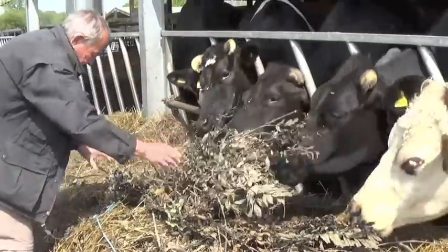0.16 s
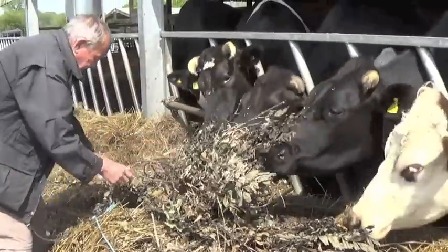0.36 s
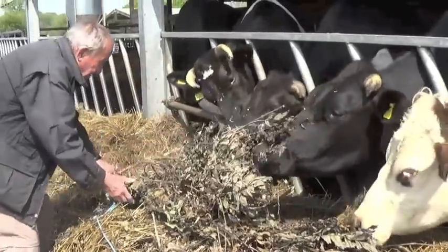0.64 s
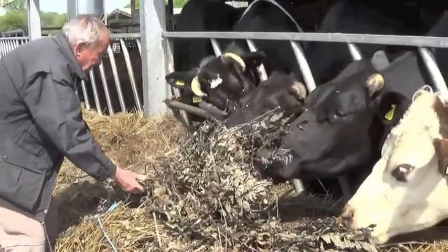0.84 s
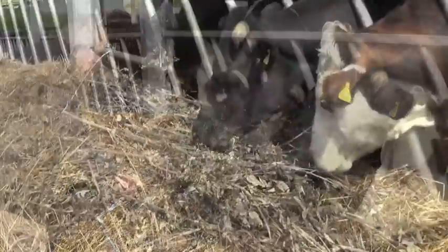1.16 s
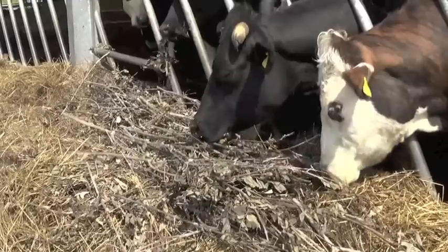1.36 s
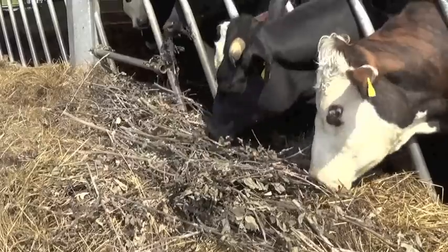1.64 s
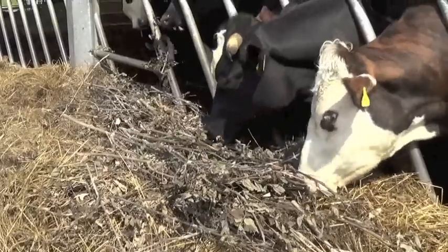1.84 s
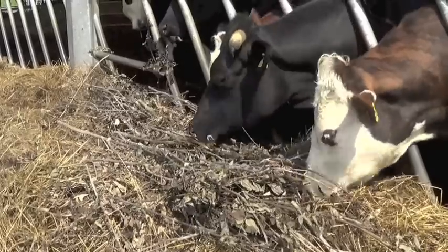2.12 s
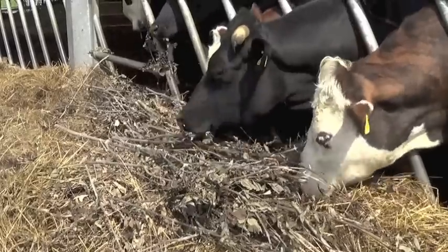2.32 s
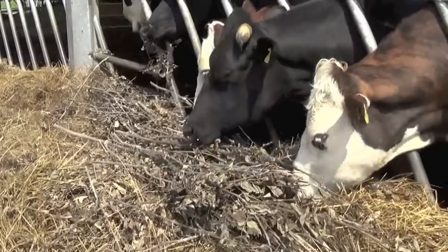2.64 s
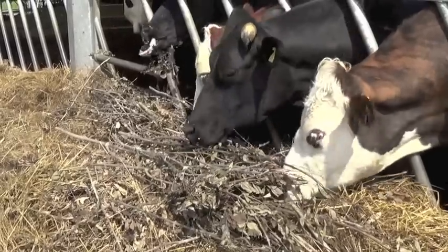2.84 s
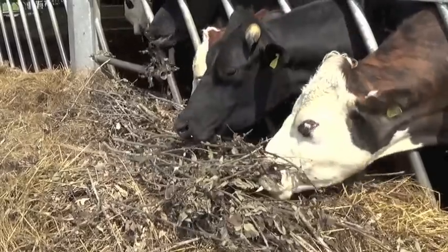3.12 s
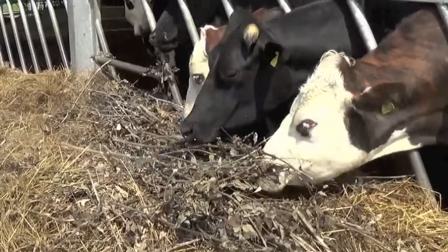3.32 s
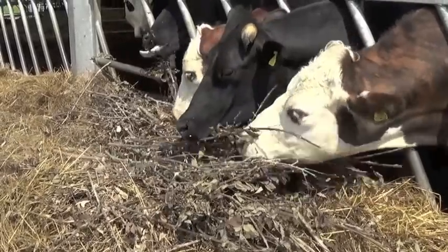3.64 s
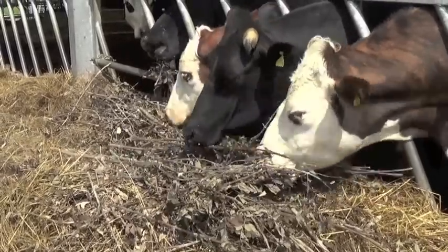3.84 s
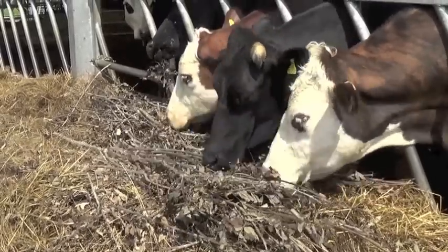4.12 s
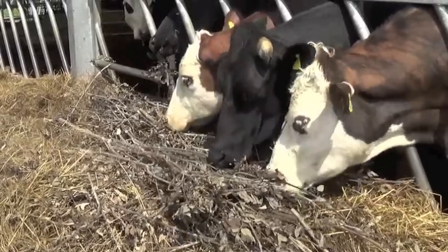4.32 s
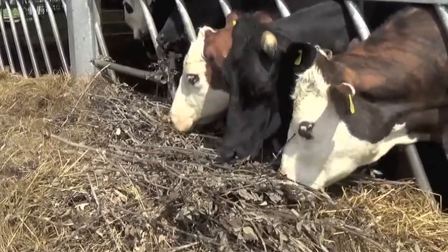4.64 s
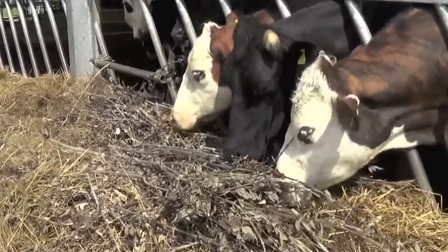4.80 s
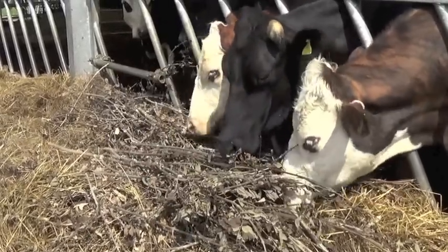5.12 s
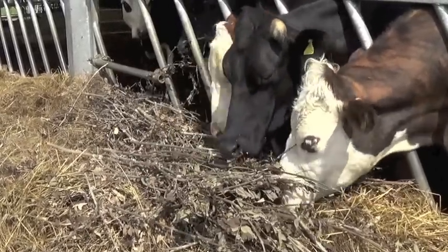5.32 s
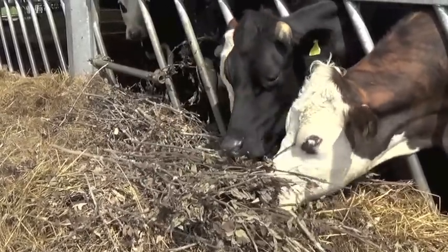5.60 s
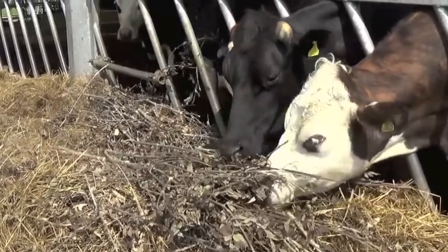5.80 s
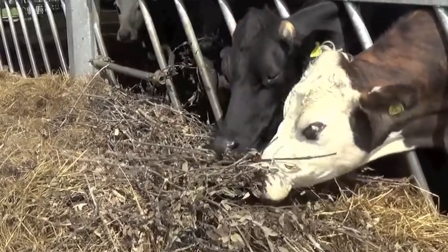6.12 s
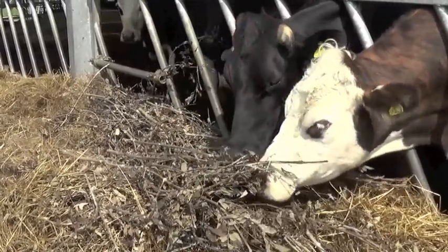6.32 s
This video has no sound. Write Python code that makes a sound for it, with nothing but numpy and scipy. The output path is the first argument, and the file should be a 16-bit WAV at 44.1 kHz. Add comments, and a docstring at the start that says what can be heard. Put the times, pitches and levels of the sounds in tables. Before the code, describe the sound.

Dry leaves crackle and rustle densely from start to finish, about six and a half seconds, as cattle tug at a heap of branches close to a stereo microphone in a barn. The bright, brittle sound swells with each pull, notably at the start and around 1.8, 2.1, 3, 4.1 and 6.2 seconds. Twigs tick and snap sharply throughout, clustering near 1.7, 2.4 to 2.9, 4.5 and 5.3 seconds. A distant cow hums faintly during the first second. Heads and hooves bump dully at 0.3, around 2.3, 3.3 and 5.5 seconds. A near cow gives one short, fluttering snort at 2.6 seconds. Necks rubbing the steel rail make faint squeaks and scrapes, mostly between 4 and 4.8 seconds, and a neck chain clinks once against it at 4.9. Soft puffs of air rumble on the microphone, mainly near 2.4 and 3.3 seconds, over a low, steady barn murmur.

```python
"""Dry leafy branches crackle and snap as cattle tug at them along a feed rail, close to the microphone.
Countless brittle leaves crack in swells, twigs break, heads and hooves bump. A neck chain chimes once
on the steel rail, and rubbing necks make it squeak. A near cow snorts through flapping nostrils and
a far one hums. Puffs of air buffet the camera's stereo microphone over the murmur of the barn."""
import sys
import numpy as np
from scipy import signal
from scipy.fft import rfft, irfft
from scipy.io import wavfile
from scipy.ndimage import uniform_filter1d

SR = 44100
rng = np.random.default_rng(int(sys.argv[2]) if len(sys.argv) > 2 else 0)


def generate_wav(sig):
    """Save sig (samples, or channels by samples) to the path in sys.argv[1] as 16-bit PCM at SR."""
    pcm = np.round(np.clip(np.atleast_2d(sig).T, -1, 1) * 32767).astype(np.int16)
    wavfile.write(sys.argv[1], SR, pcm)


N = 284841

# Dry leaves at close range: freq_hz, gain_db
LEAF_SPECTRUM = [(240, -41), (400, -15), (585, -26), (727, -13.5), (1250, -18.5), (1440, -16), (1780, -11),
                 (3240, -7), (4810, -3.5), (6670, -1.5), (8630, 5), (10300, 4.5), (13400, -80),
                 (22000, -120)]
# Spread of the heap across the stereo microphone: freq_hz, side_minus_mid_db
HEAP_WIDTH = [(60, -11), (110, 2), (190, 9), (340, -55), (610, -31.5), (1090, -27), (1950, -14),
              (3470, -16.5), (6200, -17.5), (11100, -17)]
# How hard the herd works at the heap: time_s, level_db
BROWSING = [(0.0, -23.5), (.13, -24), (.32, -32.5), (.66, -26.5), (1.06, -29), (1.5, -27.5), (1.9, -31.5),
            (2.12, -22.5), (2.3, -25.5), (2.6, -33.5), (2.96, -21.5), (3.26, -31.5), (3.46, -23.5),
            (3.8, -26), (4.08, -22.5), (4.2, -29), (4.6, -30), (5.07, -37.5), (5.35, -34.5), (5.55, -26),
            (5.74, -33.5), (6.05, -26.5), (6.46, -43)]
# Single tugs that swish a branch out: peak_s, level_db, fall_s
BRANCH_TUGS = [(.1, -24, .05), (0.595, -25.5, 0.048), (0.853, -27.5, 0.048), (1.175, -32, 0.16),
               (1.384, -32.5, 0.052), (1.64, -24, 0.042), (1.777, -22, 0.055), (2.066, -28, 0.033),
               (2.397, -31.5, 0.042), (2.586, -29, 0.02), (3.326, -28.5, 0.073), (3.938, -26.5, 0.046),
               (4.396, -36.5, 0.12), (4.54, -43, 0.022), (4.657, -29, 0.017), (4.784, -29, 0.1),
               (4.886, -25.5, 0.019), (4.995, -32, 0.028), (5.13, -32, 0.035), (5.256, -35.5, 0.054),
               (5.446, -30, 0.05), (5.56, -26, .04), (5.79, -25, 0.021), (5.91, -26, 0.088),
               (6.246, -21.5, 0.12)]

def leaves(cracks_per_s=3000, spread_db=4.0, cycles=1.63, stems_follow=0.72):
    """Brittle leaves right at the microphone crack in clumps, each crack dying in a few cycles."""
    t, crackle = np.arange(400) / SR, np.zeros((2, N))
    for hz in np.geomspace(600, 10500, num=16):
        size = gain_of(spread_db * np.minimum(rng.exponential(1, N), 5)) * rng.choice([-1., 1.], N)
        cracks = size * (rng.random(N) < cracks_per_s / SR * hz / 5000)  # denser at higher pitch
        ring = np.sin(2 * np.pi * hz * t) * np.exp(-t * hz / cycles)
        mid_side = signal.oaconvolve([cracks, cracks * rng.standard_normal(N)], ring[None], axes=1)[:, :N]
        patches = gain_of(2.26 * wander(rate_hz=27))
        crackle += np.sqrt(hz) * mid_side / np.std(mid_side[0]) * patches  # equal power per hertz
    hiss = gain_of(-4) * rng.standard_normal((2, N))  # leaves farther off blur together
    clumps = gain_of(1.37 * wander(rate_hz=58))
    mid, side = colour((unit_rms(crackle) + hiss) * clumps, LEAF_SPECTRUM)
    heap = stereo(mid, colour(side, HEAP_WIDTH)) / np.std(band(mid, 6400, 10140))
    stems, fine = split(heap, hz=2700)
    tugs = swells([(s, db, 0.45 * fall, fall) for s, db, fall in BRANCH_TUGS])
    fine_db = 10 * np.log10(gain_of(2 * curve(BROWSING)) + tugs)
    stems_db = fine_db - (1 - stems_follow) * (fine_db - fine_db.mean())  # coarse stems swell less
    return gain_of(fine_db) * fine + gain_of(stems_db) * stems


# Twigs breaking in the heap: start_s, level_db, relative_body_db
TWIG_BREAKS = [(0.5119, -10.5, -4), (0.7218, -12, -9), (1.0345, -10.5, -10), (1.3972, -9, -15),
               (1.6821, -6, -21), (1.722, -5, -14), (1.915, -12, -26), (1.941, -10, -23),
               (2.0043, -11, -19), (2.3883, -5, -25), (2.5708, -6.5, -19), (2.6646, -10.5, -20),
               (2.719, -10, -21), (2.7507, -16, -13), (2.787, -9, -19), (2.847, -7, -12), (3.0445, -7, -16),
               (3.2126, -6.5, -25), (3.271, -12.5, -20), (3.3547, -8, -18), (3.6626, -7, -16),
               (3.9762, -6.5, -25), (4.4043, -7, -20), (4.454, -7, -15), (4.5154, -10, -25),
               (4.562, -8.5, -10), (4.792, -8.5, -20), (4.9751, -13.5, -20), (5.112, -13.5, -19),
               (5.21, -13.5, -18), (5.247, -10.5, -24), (5.257, -13, -25), (5.2752, -8, -17),
               (5.3075, -8, -14), (5.3552, -24, -13), (5.7853, -9, -20), (6.1424, -8, -16),
               (6.2835, -8, -22), (6.354, -7, -18)]

def twig_snaps(t60_s=0.02, tick_db=11.0, tick_s=0.0022):
    """Each close break is a sharp tick and a splintering burst; thick twigs have more woody body."""
    out, t = np.zeros((2, N)), np.arange(3000) / SR
    for s, db, body_db in TWIG_BREAKS:
        noise = rng.standard_normal(len(t))
        pan, shorten = rng.standard_normal(2)
        splinter = gain_of(-60 * t / t60_s / 0.9 ** shorten)
        envelope = splinter + gain_of(tick_db) * np.exp(-(t / tick_s) ** 2)
        edge, body = envelope * band(noise, 7000, 11000), envelope * band(noise, 2100, 6440)
        burst = gain_of(db) * (edge / abs(edge).max() + gain_of(body_db) * body / abs(body).max())
        add(out[0], s, burst * (1 + 0.13 * pan))
        add(out[1], s, burst * (1 - 0.21 * pan))
    return out


def twig_ticks(per_s=70, base_db=-13, spread_db=2.0):
    """Small twigs give very short ticks all through the heap."""
    size = gain_of(base_db + spread_db * np.minimum(rng.exponential(1, N), 3))
    ticks = size * (rng.random(N) < per_s / SR)
    return band(stereo(ticks, .15 * ticks * rng.standard_normal(N)), 3470, 9900)


# Heads and hooves at the rail: peak_s, level_db, pitch_hz
BODY_BUMPS = [(.306, -33, 300), (1.827, -42, 130), (2.178, -34, 200), (2.288, -29, 115), (2.385, -29, 170),
              (2.712, -39, 170), (3.203, -33, 270), (3.266, -36, 298), (3.385, -34, 250), (3.418, -30, 230),
              (3.484, -36, 130), (3.962, -40, 160), (4.691, -36, 560), (5.443, -35, 149), (5.553, -35, 140)]

def bumps(cycles=1.7, grit=0.9):
    """A head or hoof lands as a dull, low push with no ring."""
    out, t = np.zeros(N), np.arange(-1500, 1500) / SR
    for s, db, hz in BODY_BUMPS:
        rough = unit_rms(band(rng.standard_normal(len(t)), 0.4 * hz, 2.4 * hz))
        push = grit * rough - np.cos(2 * np.pi * hz * t)
        add(out, s + t[0], gain_of(db) * push * np.exp(-(t * hz / cycles) ** 2))
    return out


# Modes of the steel feed rail: pitch_hz, level_db, t60_s
RAIL_MODES = [(583, -18, 0.66), (2653, -15, 0.58), (2700, -6, 0.53), (2694, -3, .3), (2930, -9, 0.36),
              (2994, 1.5, 0.13), (4030, -6, 0.11), (7400, -28, 0.34), (7900, -6, .25), (7620, 4, 0.18),
              (7780, 3, 0.2), (8500, -34, 0.36)]

def chain_chime(start_s=4.876, gain_db=-26, rebound_s=.037):
    """A link of a neck chain strikes the rail, rattles and rebounds once."""
    out, t = np.zeros(N), np.arange(SR // 2) / SR
    ring = sum(gain_of(db - 60 * t / t60) * np.sin(2 * np.pi * (hz * t + rng.random()))
               for hz, db, t60 in RAIL_MODES)
    clack = gain_of(3 - 60 * t / 0.075) * band(rng.standard_normal(len(t)), 340, 7800)
    blows = gain_of(-11) * rng.standard_normal(2500) * (rng.random(2500) < .003)  # the rattle
    blows[0], blows[round(rebound_s * SR)] = 1, gain_of(-3)
    add(out, start_s, gain_of(gain_db) * signal.oaconvolve(blows, ring + clack))
    return out


# Faint squeaks and scrapes along the rail: start_s, level_db, pitch_hz, width_hz, length_s
RAIL_RUBS = [(.64, -42, 429, 56, .1), (0.7, -43.5, 910, 380, 0.14), (3.976, -43, 1316, 59, 0.1),
             (4.09, -46, 1200, 70, 0.099), (4.14, -49, 1255, 90, 0.56), (4.707, -38, 1060, 400, 0.06),
             (4.704, -40.5, 1900, 370, 0.064), (4.707, -37, 2850, 600, 0.058),
             (1.565, -34.5, 2950, 500, 0.058), (5.9, -36, 5800, 100, 0.08)]

def rail_squeaks():
    """Necks rub the steel: a narrow resonance squeaks, a wide one scrapes."""
    out = np.zeros(N)
    for s, db, hz, width, length in RAIL_RUBS:
        rub = resonate(rng.standard_normal(int(length * SR)), hz, width)
        add(out, s, gain_of(db) * unit_rms(rub) * np.sqrt(np.hanning(len(rub))))
    return out


# Resonances of the near cow's nose: pitch_hz, width_hz, level_db
NOSE_RESONANCES = [(372, 230, 7), (660, 540, 16), (950, 520, -17), (1250, 350, -14)]
# Blasts of her breath: peak_s, level_db, rise_s
SNORT_BLASTS = [(2.626, -31.5, 0.053), (2.679, -37, .025)]

def near_snort(flap_hz=127, flap_db=-2.5, fall_s=0.0094):
    """A cow near the microphone blasts air through nostrils that flap quickly."""
    turns = np.cumsum(flap_hz * (1 + .015 * wander(rate_hz=48))) / SR
    flaps = np.diff(np.floor(turns), prepend=0)
    breath = rng.standard_normal(N) + gain_of(flap_db) * flaps * np.sqrt(SR / flap_hz)
    nose = sum(gain_of(db) * unit_rms(resonate(breath, hz, width)) for hz, width, db in NOSE_RESONANCES)
    return np.sqrt(swells([(s, db, rise, fall_s) for s, db, rise in SNORT_BLASTS])) * unit_rms(nose)


# Air rumbling on the microphone: freq_hz, gain_db
PUFF_SPECTRUM = [(15, -35), (25, -15), (91, 0), (173, -1.5), (223, -1.5), (647, -15.5), (763, -28),
                 (900, -31), (1170, -36), (1980, -120)]
# Gusts passing over it: peak_s, level_db, rise_and_fall_s
PUFFS = [(.7, -55.5, 0.47), (1.705, -55, 0.18), (2.363, -39.5, 0.22), (2.62, -55, 0.097), (3.34, -42, 0.26),
         (3.74, -47, .14), (4.355, -52, 0.19), (4.808, -54.5, 0.16), (5.165, -49.5, 0.062),
         (5.562, -42.5, 0.087), (5.98, -55.5, 0.17), (6.46, -50.5, .12)]

def air_puffs(calm_db=-65.5, lumps_db=3.0, side_db=-4.0):
    """Lumpy turbulence at the microphone ports; the longest waves reach both alike."""
    mid, side = colour(rng.standard_normal((2, N)), PUFF_SPECTRUM) * gain_of(lumps_db * wander(26))
    power = gain_of(2 * calm_db) + swells([(s, db, length, length) for s, db, length in PUFFS])
    _, short_waves = split(side, hz=90)
    return np.sqrt(power) * stereo(mid, gain_of(side_db) * short_waves) / np.std(mid)


# A cow's call from far across the barn: time_s, pitch_hz, level_db
FAR_CALL = [(.1, 257.7, -61), (.2, 270.6, -51.5), (.35, 281, -50), (.64, 278, -42.5), (.75, 274, -45),
            (.94, 268.4, -40.5), (1.0, 253, -48), (1.07, 258, -60)]

def far_hum(octave_db=-22):
    """A closed-mouth low, nearly a pure tone at this distance."""
    t = np.arange(N) / SR
    phase = 2 * np.pi * np.cumsum(curve(FAR_CALL)) / SR
    tone = np.sin(phase) + gain_of(octave_db) * np.sin(2 * phase)
    calling = (t > FAR_CALL[0][0]) & (t < FAR_CALL[-1][0])
    return np.sqrt(2) * gain_of(curve(FAR_CALL, column=2)) * tone * calling


# Room tone of the barn: freq_hz, gain_db
BARN_SPECTRUM = [(53, -46), (90, -13.5), (161, -19), (362, -0.5), (519, -8.5), (622, -2.5), (869, 0),
                 (1430, -6.5), (2500, -6.5), (3250, -17), (5500, -120)]

def barn_murmur(level_db=-49.5, side_db=-7, swell_db=2.15):
    """The herd and the yard blend into a low murmur behind everything."""
    mid, side = colour(rng.standard_normal((2, N)), BARN_SPECTRUM)
    level = gain_of(level_db + swell_db * wander(rate_hz=8.2))
    return level * stereo(mid, gain_of(side_db) * side) / np.std(mid)


def wall_echoes(x, first_s=0.002, t60_s=0.07):
    """Early reflections from posts and walls around the microphone."""
    t = np.arange(4000) / SR
    taps = rng.standard_normal(len(t)) * gain_of(-60 * t / t60_s) * (t > first_s)
    return signal.oaconvolve(x, taps / np.linalg.norm(taps))[:N]


def gain_of(db):
    """Decibels to gain."""
    return 10 ** (np.asarray(db) / 20)


def unit_rms(x):
    """Scales to an rms of one."""
    return x / np.sqrt(np.mean(x ** 2) + 1e-20)


def curve(rows, column=1):
    """One column of a time table at every sample."""
    return np.interp(np.arange(N) / SR, [r[0] for r in rows], [r[column] for r in rows])


def swells(rows):
    """Summed power of bell-shaped swells: peak_s, level_db, rise_s, fall_s."""
    t = np.arange(N) / SR
    return sum(gain_of(2 * db) * np.exp(-((t - s) / np.where(t < s, rise, fall)) ** 2)
               for s, db, rise, fall in rows)


def wander(rate_hz):
    """Smooth random drift with an rms of one."""
    size = max(int(SR / rate_hz / 2), 2)
    return unit_rms(uniform_filter1d(uniform_filter1d(rng.standard_normal(N), size), size))


def add(mix, start_s, sound):
    """Lays a sound into the mix."""
    part = mix[max(round(start_s * SR), 0):][:len(sound)]
    part += sound[:len(part)]


def colour(x, spectrum):
    """Filters by a spectrum table, read on a log-frequency axis."""
    hz, db = np.transpose(spectrum)
    bins_hz = np.fft.rfftfreq(x.shape[-1], 1 / SR)
    bins_db = np.interp(np.log(bins_hz + 1), np.log(hz + 1), db)
    return irfft(rfft(x) * gain_of(bins_db), x.shape[-1])


def band(x, lo_hz, hi_hz):
    """Band-pass."""
    return signal.sosfilt(signal.butter(2, [lo_hz, hi_hz], "bandpass", fs=SR, output="sos"), x)


def split(x, hz):
    """The parts below and above hz; they sum to the whole."""
    low = signal.sosfiltfilt(signal.butter(1, hz, fs=SR, output="sos"), x)
    return low, x - low


def resonate(x, hz, width_hz):
    """Two resonances in series; each shifts hz down to zero, smooths and shifts back."""
    turn = np.exp(2j * np.pi * hz * np.arange(1, len(x) + 1) / SR)
    pole = np.exp(-np.pi * width_hz / SR)
    for _ in range(2):
        x = 2 * (turn * signal.lfilter([1 - pole], [1, -pole], x / turn)).real
    return x


def stereo(mid, side):
    """Mid and side to left and right."""
    return np.array([mid + side, mid - side])


def scene():
    """From the feed rail: the heap spreads wide; cows and steel sit central, widened by echoes."""
    centre = bumps() + far_hum() + near_snort() + chain_chime() + rail_squeaks()
    heap = leaves() + twig_snaps() + twig_ticks()
    return heap + air_puffs() + barn_murmur() + stereo(centre, gain_of(-10.5) * wall_echoes(centre))


def record(dry, roll_off_hz=10248, limit_hz=11687):
    """The camera's steep treble roll-off, then the band limit."""
    rolled = signal.sosfilt(signal.cheby1(12, .5, roll_off_hz, fs=SR, output="sos"), dry)
    band_limit = signal.firwin(511, limit_hz, window=("kaiser", 9), fs=SR)
    return signal.oaconvolve(rolled, band_limit[None], "same")


dry = scene()
out = record(dry)
generate_wav(out)
```